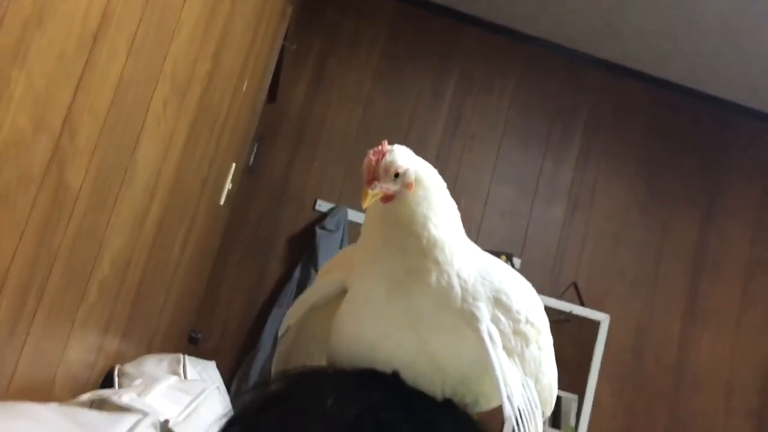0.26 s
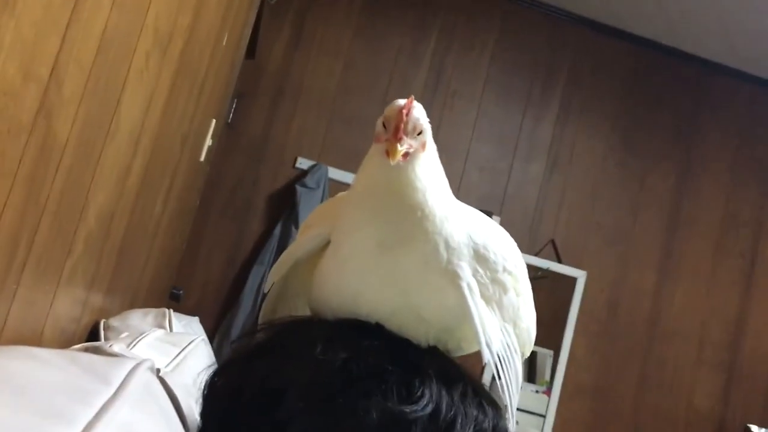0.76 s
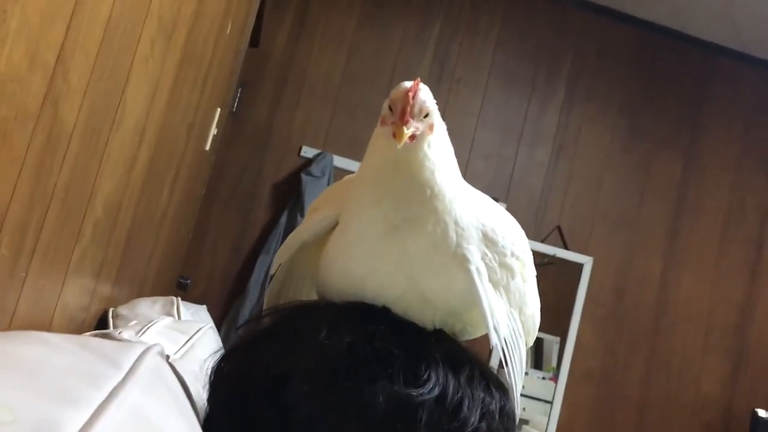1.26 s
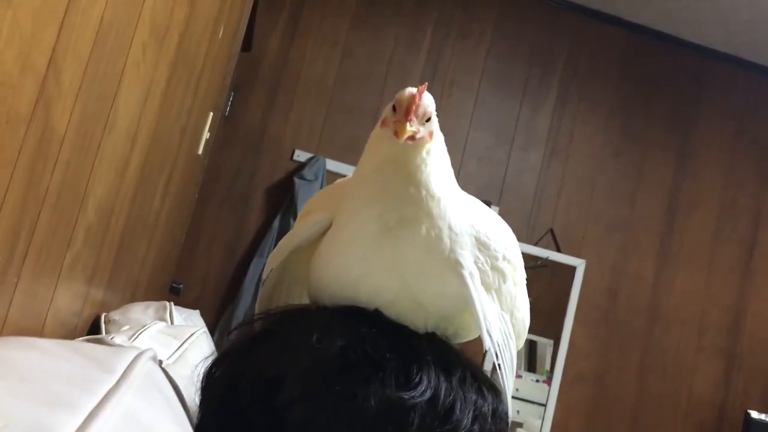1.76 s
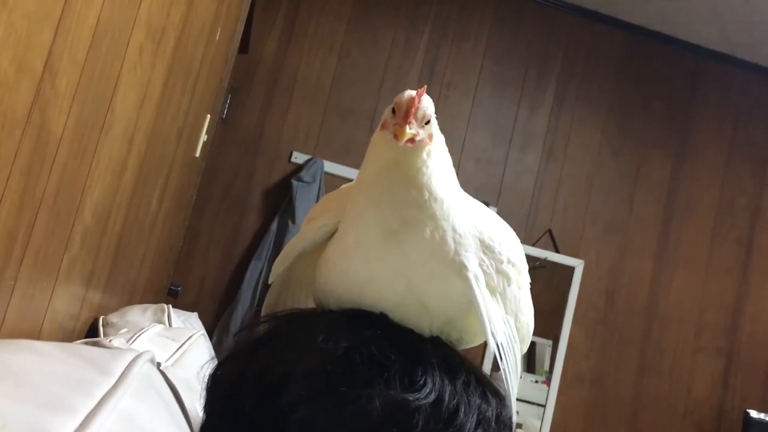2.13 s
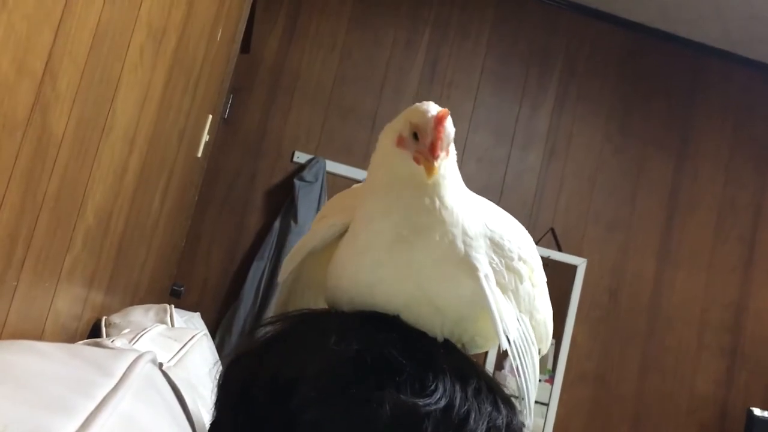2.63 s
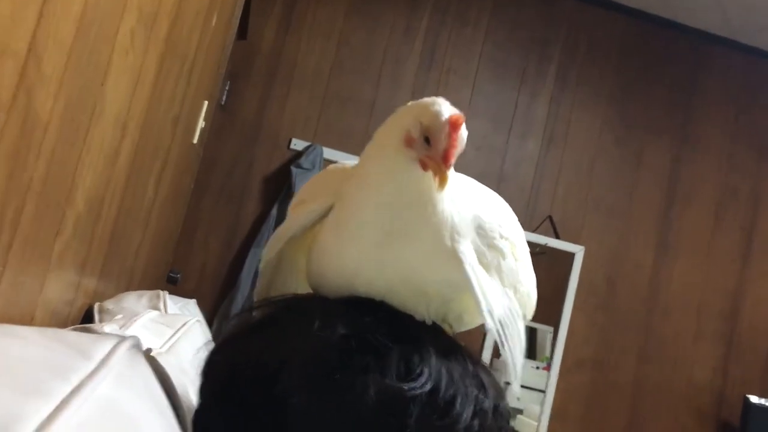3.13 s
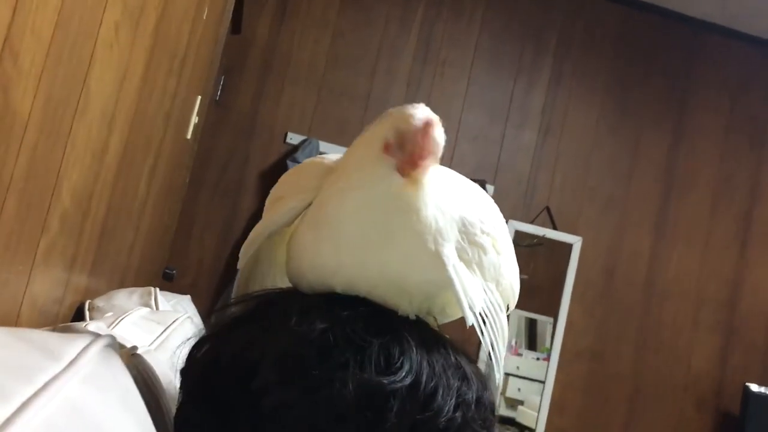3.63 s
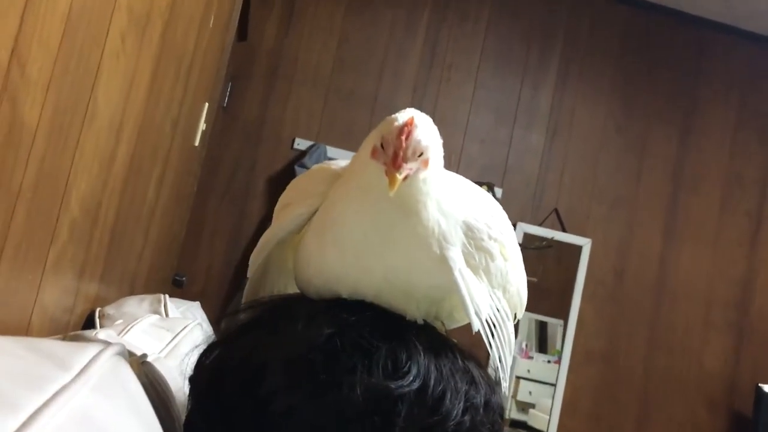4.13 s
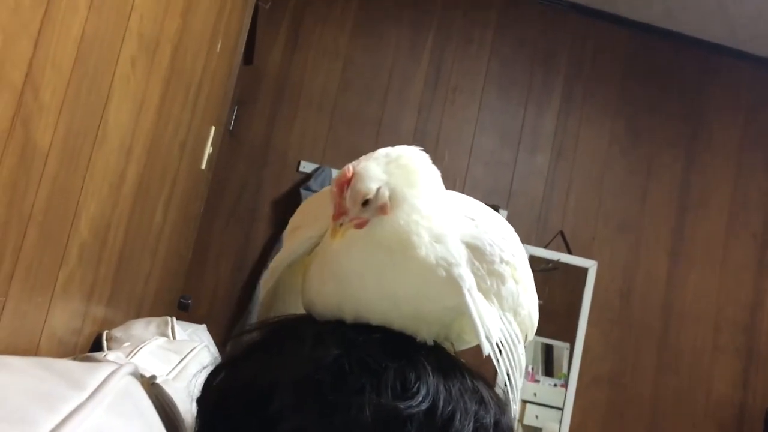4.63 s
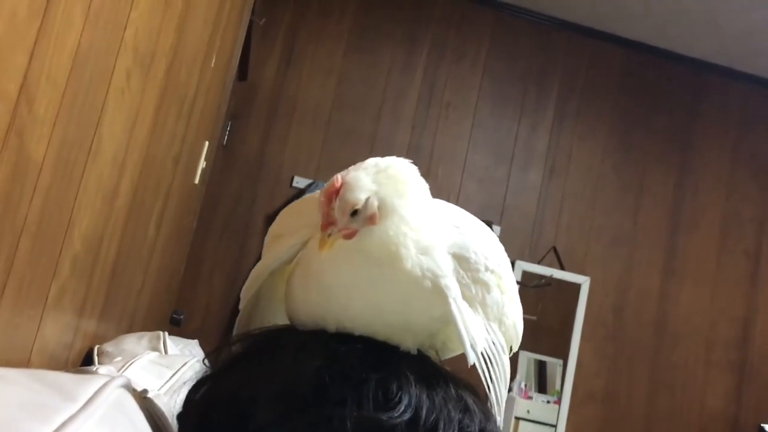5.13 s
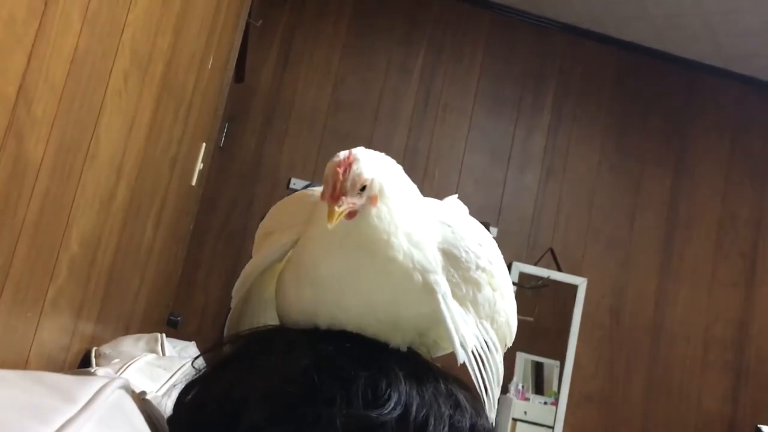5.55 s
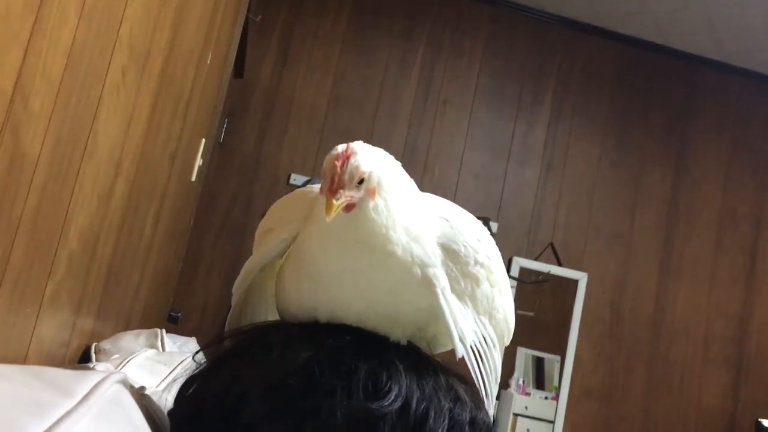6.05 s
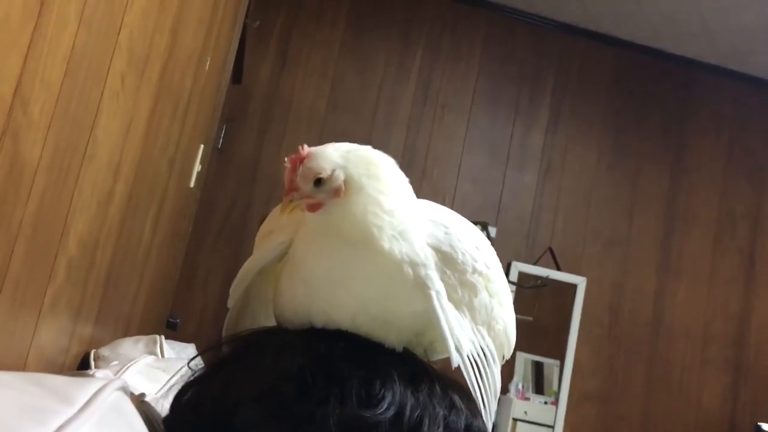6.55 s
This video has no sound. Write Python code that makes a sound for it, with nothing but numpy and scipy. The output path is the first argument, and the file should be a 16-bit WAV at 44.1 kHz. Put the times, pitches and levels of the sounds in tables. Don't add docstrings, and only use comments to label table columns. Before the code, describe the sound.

Quiet small room with faint hum and hiss; a pet hen utters three sparse plaintive calls, a brief whine, and dull handling knocks.

```python
import sys
import numpy as np
from scipy import signal
from scipy.fft import rfft, irfft, next_fast_len
from scipy.io import wavfile

SR = 44100
rng = np.random.default_rng(int(sys.argv[2]) if len(sys.argv) > 2 else 0)


def to_wav(s):
    ch = np.atleast_2d(s).T
    pcm = np.round(np.clip(ch, -1, 1) * 32767)
    wavfile.write(sys.argv[1], SR, pcm.astype(np.int16))


def voltage_ratio(decibels):
    exponent = np.asarray(decibels, float) / 20
    return 10 ** exponent


N = 299924

# its f/Hz, level/dB
SECOND_HARMONIC = [(820, -14), (880, -7.5), (925, -12), (985, -2.5), (1100, -3), (1400, -2.5), (1800, 1)]
SECOND_PER_OPEN = 0.4


def at_hz(points, hz):
    points = np.array(points)
    return np.interp(np.log(np.maximum(hz, 1)), np.log(points[:, 0]), points[:, 1])


def rms_one(x):
    return x / np.sqrt(np.mean(x ** 2) + 1e-20)


def drift(rate_hz, size):
    settle = 20000
    r = np.exp(-2 * np.pi * rate_hz / SR)
    slow = signal.lfilter([1], [1, -2 * r, r * r], rng.standard_normal(size + settle))
    return rms_one(slow[settle:])


def resonance(x, hz, width_hz):
    r = np.exp(-np.pi * width_hz / SR)
    gain = (1 - r * r) / 2
    return signal.lfilter([gain, 0, -gain], [1, -2 * r * np.cos(2 * np.pi * hz / SR), r * r], x)


def sung(curve, manner, rough, crack_after_s=np.inf):
    soft_db, open_per_db, smooth_per_db = -60, 0.67, 0.5
    crack_hz, crack_rough, crack_second_db = 760, 0.44, 18.5
    manner_second_db, manner_open_db = manner
    rows = []
    for s, pitch, db in curve:
        effort_db = np.clip(db - soft_db, -8, 20)
        cracked = s > crack_after_s and pitch > crack_hz
        effort_open_db = open_per_db * effort_db
        second_db = manner_second_db + at_hz(SECOND_HARMONIC, 2 * pitch)
        second_db += SECOND_PER_OPEN * effort_open_db + crack_second_db * cracked
        shake = rough * voltage_ratio(-smooth_per_db * effort_db) + crack_rough * cracked
        rows.append((s, pitch, db, second_db, manner_open_db + effort_open_db, shake))
    return rows


def cluck(row, pitch_curve):
    # share of rise or fall from peak, level/dB re peak, beak opening/dB
    cluck_shape = [(-1, -12, -13), (-0.7, -5.5, -4), (-.3, 0, 7.5), (0, 0, 7.5), (.4, -2.5, 6.5),
                   (.75, -5, 4.5), (1, -11.5, -3.5), (1.1, -47.5, -4)]
    clear_rough, cluck_second_db = 0.035, 3
    peak_s, rise_s, fall_s, peak_db, wide_db = row
    share, shape_db, shape_open_db = np.transpose(cluck_shape)
    shape_s = peak_s + share * np.where(share < 0, rise_s, fall_s)
    pitch_s, pitch_hz = np.transpose(pitch_curve)
    s = np.union1d(shape_s, pitch_s[pitch_s > shape_s[0]])
    pitch = np.interp(s, pitch_s, pitch_hz)
    db = np.interp(s, shape_s, shape_db)
    open_db = np.interp(s, shape_s, shape_open_db)
    second_db = cluck_second_db + at_hz(SECOND_HARMONIC, 2 * pitch) + SECOND_PER_OPEN * open_db
    return list(zip(s, pitch, peak_db + db, second_db, open_db + wide_db, clear_rough + 0 * s))


def voice(rows):
    # f/Hz, level/dB
    windpipe = [(1000, -24), (1250, -2), (1450, 7.5), (1700, -6), (2050, -4), (2300, -30), (2650, -24),
                (3000, -49.5), (3500, -35), (4300, -72), (5350, -38), (6300, -75), (9000, -70),
                (14000, -82)]
    pipe_hz, pipe_width_hz = 1500, 500
    s, *columns = np.transpose(rows)
    span = np.arange(round(s[0] * SR), round(s[-1] * SR))
    pitch, level_db, second_db, open_db, rough = [np.interp(span / SR, s, c) for c in columns]
    rough = np.clip(rough, 0, 1)
    shaken_hz = pitch * (1 + 0.048 * rough * drift(90, len(span)))
    phase = 2 * np.pi * np.cumsum(shaken_hz) / SR

    def lag(hz):
        return np.arctan2(hz * pipe_width_hz, pipe_hz ** 2 - hz ** 2)

    tone = np.cos(phase - lag(pitch)) + voltage_ratio(second_db) * np.cos(2 * phase - lag(2 * pitch))
    for k in range(3, 30):
        hz = k * pitch
        beak_db = open_db * (0.6 + hz / 3500)
        tone += voltage_ratio(beak_db + at_hz(windpipe, hz)) * np.cos(k * phase - lag(hz)) * (hz < 15000)
    out = np.zeros(N)
    out[span] = np.sqrt(2) * voltage_ratio(level_db + 6.0 * rough * drift(60, len(span))) * tone
    return out


def breath():
    # f/Hz, width/Hz, level/dB
    low_hiss = [(520, 100, 15.5), (740, 130, 1), (1290, 550, 9), (1650, 810, 8.5), (1936, 210, 5.5),
                (2410, 490, -26)]
    high_hiss = [(3620, 1500, 2), (5200, 500, 6), (10920, 600, 0.5), (13300, 920, 1), (14700, 1000, -4)]
    # start/s, end/s, low hiss at start/dB, at end/dB, high hiss/dB
    puffs = [(0.178, 0.442, -72.5, -65.5, -81), (0.446, 0.727, -64.5, -66, -75),
             (3.05, 3.076, -69, -68, -75), (3.062, 3.44, -67, -59.5, -76.5), (3.243, 3.402, -78, -73, -77),
             (3.446, 3.463, -45, -52, -64), (5.434, 5.49, -63.5, -60, -74.5), (5.476, 5.593, -65, -68, -77),
             (5.57, 5.665, -60, -62, -76), (5.768, 5.78, -66, -67, -82), (5.784, 5.893, -68, -67.5, -83),
             (5.887, 5.943, -66, -63.5, -82), (6.07, 6.094, -72, -73, -88)]
    rise_s, fall_s, edge_db = 0.015, 0.013, 22.5
    throat_edge_hz = 2430
    out = np.zeros(N)
    for is_low, peaks in ((True, low_hiss), (False, high_hiss)):
        white = rng.standard_normal(N)
        hiss = np.zeros(N)
        for hz, width_hz, db in peaks:
            ring = resonance(resonance(white, hz, 1.5 * width_hz), hz, 1.5 * width_hz)
            hiss += voltage_ratio(db + 2.2 * drift(30, N)) * ring
        if is_low:
            hiss = signal.sosfilt(signal.butter(6, throat_edge_hz, fs=SR, output="sos"), hiss)
        puff_power = np.zeros(N)
        for start, end, low_db, low_end_db, high_db in puffs:
            first_db, last_db = (low_db, low_end_db) if is_low else (high_db, high_db)
            times = [start - rise_s, start, end, end + fall_s]
            levels = [first_db - edge_db, first_db, last_db, last_db - edge_db]
            puff_db = np.interp(np.arange(N) / SR, times, levels, left=-np.inf, right=-np.inf)
            puff_power += voltage_ratio(puff_db) ** 2
        out += np.sqrt(puff_power) * rms_one(hiss)
    return out


def room(x):
    # f/Hz, T60/s
    room_t60 = [(300, 0.11), (700, 0.38), (1400, 0.29), (1900, 0.27), (2600, 0.26), (6000, 0.15)]
    size = next_fast_len(N + SR)
    hz = np.arange(size // 2 + 1) * SR / size
    response = 0
    for k, delay_s in enumerate(rng.uniform(0.016, 0.068, 20)):
        loop = voltage_ratio(-60 * delay_s / at_hz(room_t60, hz)) * np.exp(-2j * np.pi * hz * delay_s)
        response = response + (-1) ** k * loop / (1 - loop)
    return irfft(rfft(x, size) * response, size)[:N]


def taps():
    # t/s, level/dB, f/Hz; those at 3.065 s and 5.77 s are the hen's throat as a call sets in
    knocks = [(.185, -60, 700), (.49, -62, 500), (1.029, -50, 5000), (1.65, -66, 600), (3.065, -56, 370),
              (3.332, -50, 190), (5.77, -56, 350), (6.4966, -38, 780), (6.4990, -34, 370),
              (6.75, -48.5, 109)]
    out = np.zeros(N)
    for s, db, hz in knocks:
        cycles = np.arange(round(4 * SR / hz)) * hz / SR
        knock = -np.sin(2 * np.pi * cycles) * cycles * np.exp(-2.5 * cycles) * 6
        start = round(s * SR)
        out[start:start + len(knock)] += voltage_ratio(db) * knock
    return out


def background():
    # f/Hz, level/dB per Hz
    room_air = [(20, -36.5), (30, -24), (44, 1), (64, -0.5), (87, -4.5), (119, -4), (148, -8), (270, -14),
                (306, -11.5), (340, -13.5), (430, -17), (465, -22), (1040, -24), (1600, -28.5)]
    # f/Hz, level/dB
    mic_hiss = [(1600, -2.5), (3000, -6), (4200, -7.5), (5000, -12), (5800, -8.5), (7000, -10.5),
                (7800, -12.5), (9000, -9.5), (10400, -15), (11500, -12), (14000, -13), (14800, -27),
                (15600, -13)]
    # f/Hz, level/dB, flicker/dB
    mains = [(59.5, -67.5, .8), (120.3, -68, 1.5), (301, -74.5, 1.5), (415, -84, 2.5)]
    floor_db = -59
    hz = np.arange(N // 2 + 1) * SR / N
    spectrum = voltage_ratio(at_hz(room_air, hz) + at_hz(mic_hiss, hz))
    out = voltage_ratio(floor_db) * rms_one(irfft(rfft(rng.standard_normal(N)) * spectrum, N))
    for line_hz, db, flicker_db in mains:
        phase = 2 * np.pi * line_hz * np.arange(N) / SR + 0.74 * drift(4.14, N)
        out += np.sqrt(2) * voltage_ratio(db + flicker_db * drift(4.0, N)) * np.sin(phase)
    return out


def scene():
    # t/s, pitch f/Hz, fundamental level/dB
    rising_moan = [(.24, 668, -86), (.31, 680.5, -71), (.40, 695, -66.5), (0.471, 735, -66.5),
                   (0.561, 775, -62), (0.648, 821, -61.5), (.68, 846, -63), (.704, 871, -61)]
    level_moan = [(3.17, 547, -78), (3.235, 562.8, -67), (3.25, 554, -53.5), (3.315, 562, -57.5),
                  (3.335, 552, -61.5), (3.42, 558, -57.5)]
    falling_moan = [(5.43, 478.4, -71), (5.455, 507, -55), (5.468, 430, -47.5), (5.484, 498, -56.5),
                    (5.53, 498.5, -57), (5.555, 525, -58.5), (5.576, 498, -48.5), (5.596, 460.5, -47.5),
                    (5.606, 485, -47.5)]
    whine = [(5.757, 752, -82), (5.769, 717, -62), (5.788, 640, -62.5), (5.841, 658, -62),
             (5.871, 679, -62.5), (5.894, 713, -62.5), (5.913, 814, -64), (5.94, 826, -68.5),
             (5.952, 790, -87)]
    second_side = [(3.07, 740, -78), (3.11, 723, -76), (3.19, 728, -79), (3.24, 690, -71), (3.28, 630, -75),
                   (3.38, 633, -66.5), (3.43, 680, -74.5), (3.44, 665, -89.5)]
    strand = [(3.28, 698, -88), (3.31, 717, -70), (3.40, 739, -66.5), (3.435, 762, -59), (3.445, 770, -87)]
    # second harmonic/dB re the rule, beak opening/dB
    manner = [(0, -12), (-1, -18.5), (-5.5, -20), (-18.5, 1.5), (10.5, -18), (-19, -29.5)]
    roughness = [.42, .3, .1, .17, .55, .45]
    # peak t/s, rise/s, fall/s, peak level/dB, beak opening/dB re the shared shape
    clucks = [
        (0.7308, 0.012, 0.0095, -36, -7.5),
        (3.455, .019, .021, -34.5, -0.1),
        (5.638, 0.027, 0.032, -38.5, -4),
    ]
    # t/s, f/Hz
    cluck_pitch = [
        [(.716, 963), (.722, 948), (.729, 890), (.736, 902), (.745, 900)],
        [(3.432, 550), (3.443, 527.5), (3.454, 487.3), (3.462, 468.7), (3.475, 454.4)],
        [(5.611, 487), (5.622, 460), (5.632, 425.5), (5.639, 406), (5.649, 430.6), (5.662, 403.5), (5.671, 417)],
    ]
    room_db = -22.5

    curves = (rising_moan, level_moan, falling_moan, whine, second_side, strand)
    cracks_s = [np.inf] * 6
    cracks_s[3] = whine[2][0]
    notes = [sung(*note) for note in zip(curves, manner, roughness, cracks_s)]
    for moan, row, pitch_curve in zip(notes, clucks, cluck_pitch):
        moan += cluck(row, pitch_curve)
    hen = sum(voice(sorted(note)) for note in notes[:-1]) + breath()
    faint_strand = voice(notes[-1])
    mix = hen + voltage_ratio(room_db) * room(hen) + taps() + background() + faint_strand
    return mix[None]


def top_cut(x):
    return signal.sosfilt(signal.butter(12, 15610, fs=SR, output="sos"), x)


def record(dry):
    top_hz = 15000
    dull = signal.sosfilt(signal.cheby2(10, 22, top_hz, fs=SR, output="sos"), dry)
    return top_cut(dull)


dry = scene()
out = record(dry)
to_wav(out)
```